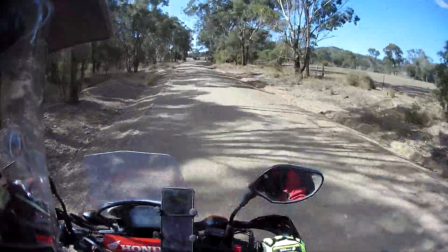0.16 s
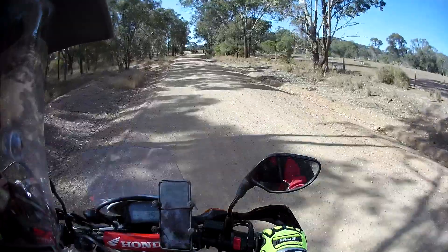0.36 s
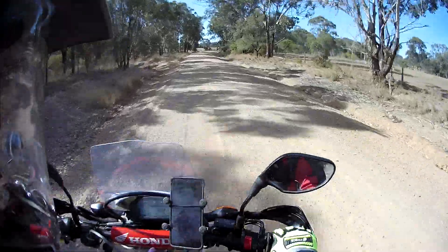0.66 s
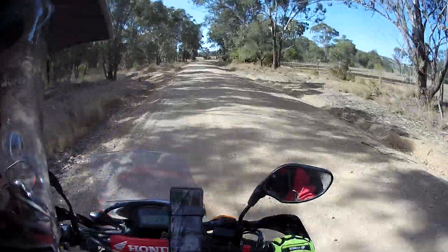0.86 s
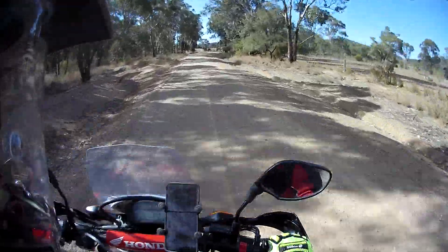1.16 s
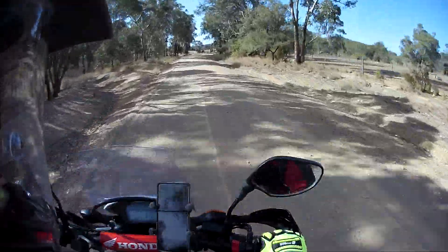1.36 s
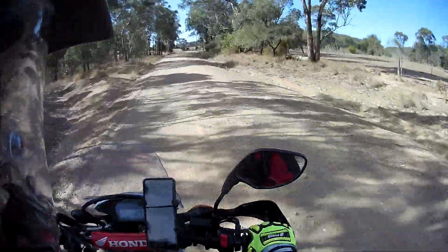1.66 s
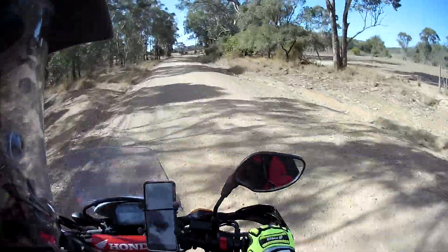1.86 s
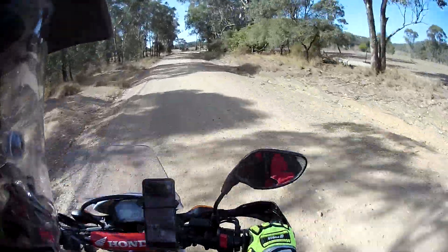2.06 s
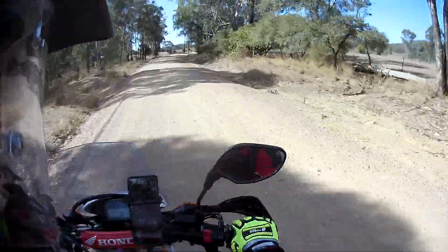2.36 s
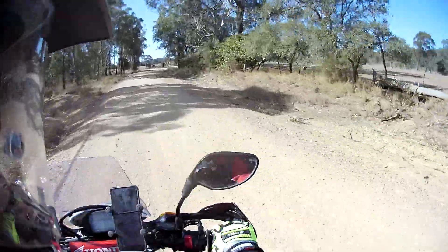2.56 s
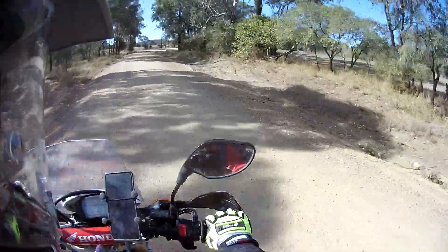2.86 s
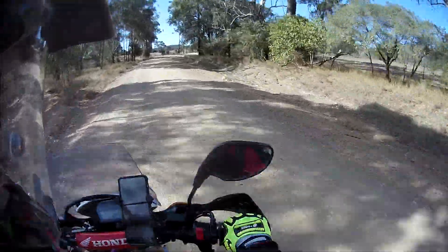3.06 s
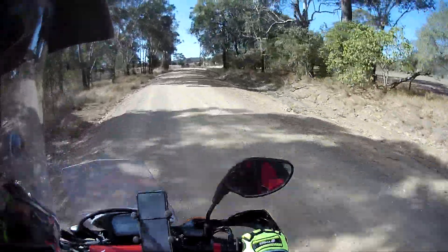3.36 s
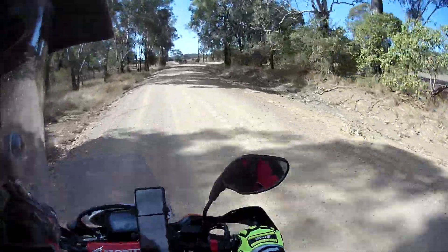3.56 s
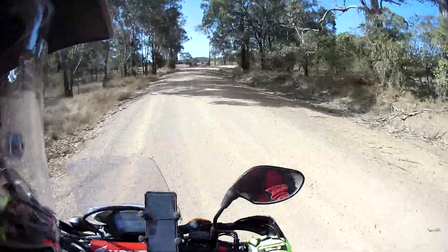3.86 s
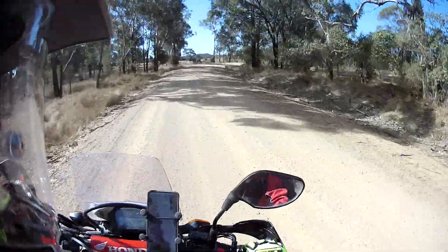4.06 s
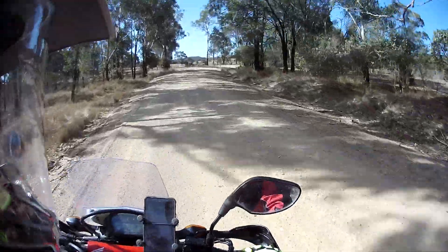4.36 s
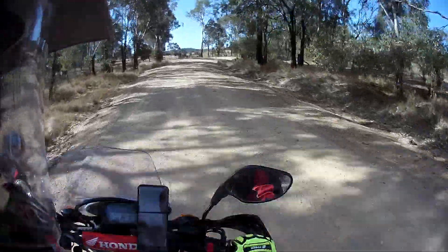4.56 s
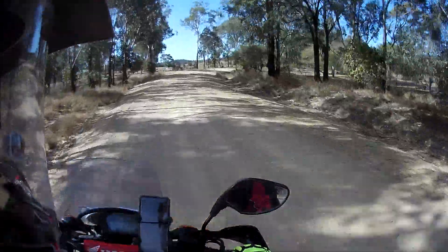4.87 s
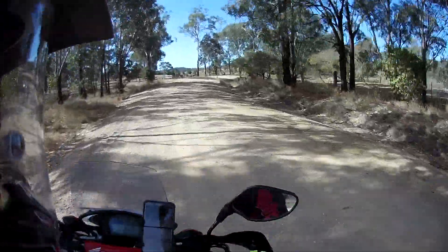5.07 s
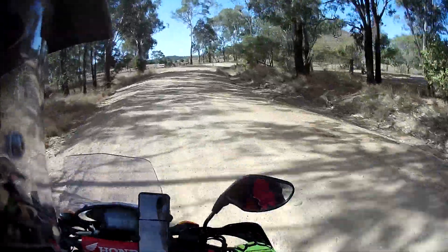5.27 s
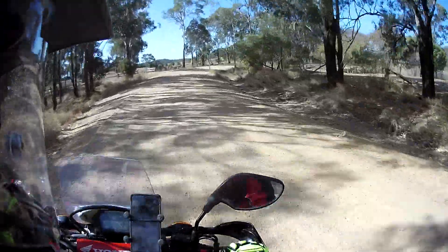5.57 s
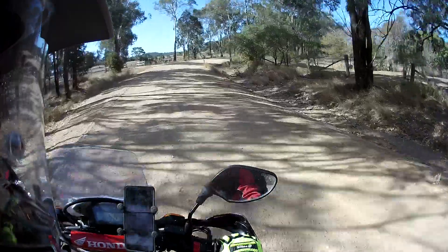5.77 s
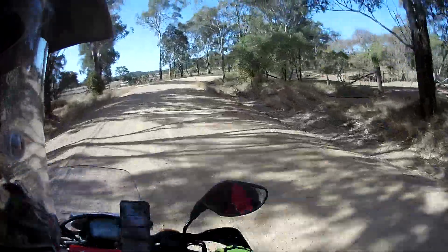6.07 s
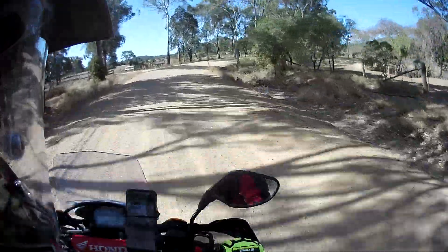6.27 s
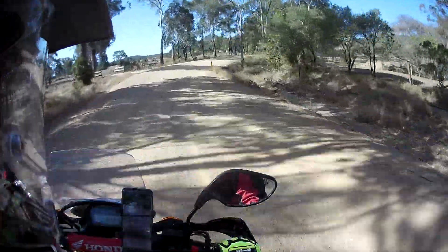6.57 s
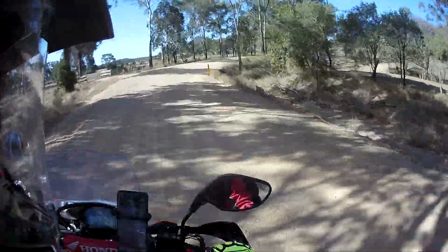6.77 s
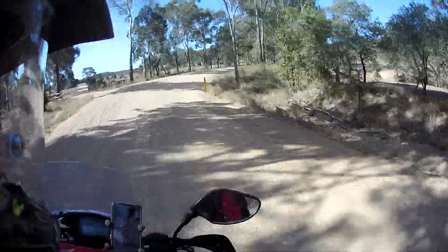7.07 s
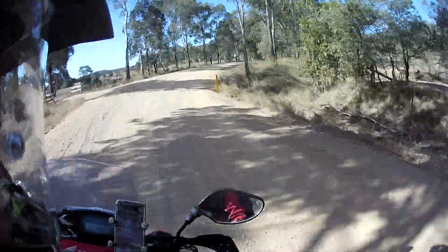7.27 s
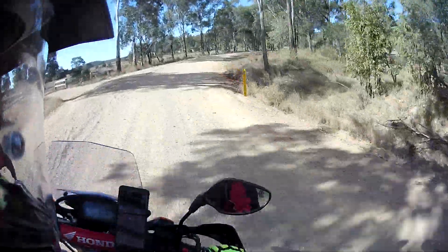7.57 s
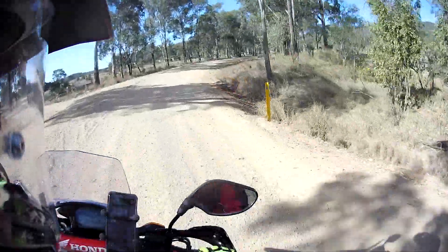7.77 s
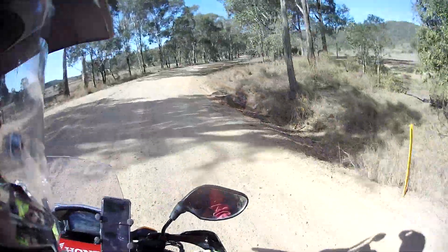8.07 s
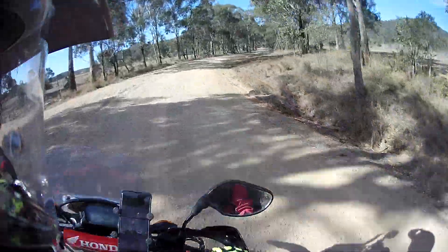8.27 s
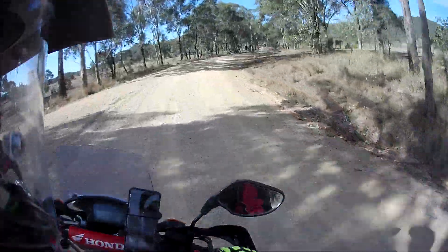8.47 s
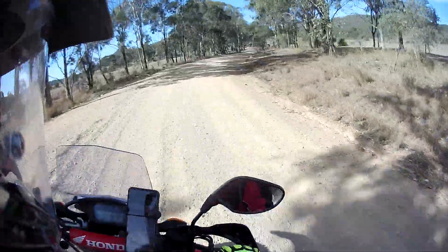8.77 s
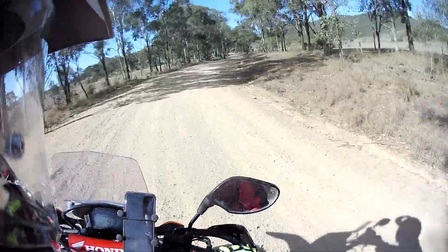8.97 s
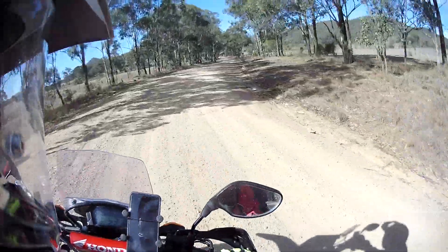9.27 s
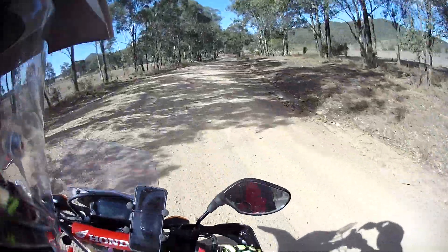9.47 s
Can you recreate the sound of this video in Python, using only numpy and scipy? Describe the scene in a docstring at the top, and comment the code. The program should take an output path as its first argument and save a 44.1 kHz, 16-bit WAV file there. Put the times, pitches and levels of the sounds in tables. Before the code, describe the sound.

A single-cylinder motorcycle slows on a gravel road amid buffeting wind and tyre rush, then its throttle opens into a steady, deepening thump.

```python
"""A single-cylinder motorcycle slows down on a gravel road, heard from the rider's helmet.
From the start it thumps, hums and whines, with wind and tyre rush made of shaped noise. In the first 1.5 s
gusts slap the helmet; ruts knock the fairing now and then until 5.4 s, both as short dying rings.
The throttle goes on and off, with a low exhaust drone of stacked sines while it is shut or barely open.
A stone pings off the bike just before 6 s. From about 7 s the throttle opens steadily, each firing
ringing the pipe in an even thump at low revs."""
import sys
import numpy as np
from scipy import signal
from scipy.fft import rfft, irfft
from scipy.io import wavfile
from scipy.ndimage import uniform_filter1d

SR = 44100
rng = np.random.default_rng(int(sys.argv[2]) if len(sys.argv) > 2 else 0)


def generate_wav(sig):
    """Save sig (samples, or channels by samples) to the path in sys.argv[1] as 16-bit PCM at SR."""
    pcm = np.round(np.clip(np.atleast_2d(sig).T, -1, 1) * 32767).astype(np.int16)
    wavfile.write(sys.argv[1], SR, pcm)


N = 425124
TIME = np.arange(N) / SR
HAND_S = 0.13  # time the hand takes to turn the grip
CRUISE_RATE = 36  # firings per second; levels that follow the revs are given at this rate


def gain_of(db):
    """Turns decibels into a gain."""
    return 10 ** (np.asarray(db) / 20)


def evened(x):
    """Scales a sound to an rms of 1."""
    return x / np.sqrt(np.mean(x ** 2) + 1e-20)


def hand_smoothed(x):
    """Spreads each sudden change over the time the hand takes to turn the grip."""
    return uniform_filter1d(x, int(HAND_S * SR))


def coloured(x, points):
    """Shapes the spectrum of x by (frequency [Hz], level [dB]) points, at an rms of 1."""
    hz, db = np.transpose(points)
    bins = np.fft.rfftfreq(N, 1 / SR)
    shape_db = np.interp(np.log(bins + 1), np.log(hz), db)
    return evened(irfft(rfft(x) * gain_of(shape_db), N))


def wander(rate_hz):
    """Smooth random drift with an rms of 1; movement much faster than the rate is faded out."""
    bins = np.fft.rfftfreq(N, 1 / SR)
    return evened(irfft(rfft(rng.standard_normal(N)) * np.exp(-(bins / rate_hz) ** 2), N))


def ring(x, hz, width_hz):
    """One resonance, fixed or moving in pitch: a click rings as a dying sine; a narrow width rings longer."""
    turn = np.exp(2j * np.pi * np.cumsum(hz * np.ones(N)) / SR)
    decay = np.exp(-np.pi * width_hz / SR)
    # the tiny offset keeps the filter from slowing down on near-zero numbers
    return (turn * signal.lfilter([1], [1, -decay], x / turn + 1e-18)).imag


def note(cycles, multiple, waver, waver_hz):
    """A sine at a whole multiple of the firing rate, its phase wavering by so many radians rms."""
    return np.sin(2 * np.pi * round(multiple) * cycles + waver * wander(waver_hz))


# Engine speed along the ride: (time [s], firing rate [firings per second])
ENGINE_SPEED = [(0, 43.8), (.6, 43.1), (1.1, 41.15), (1.5, 40.72), (1.85, 39.74), (2.15, 39.0),
                (2.35, 39.93), (2.6, 38.97), (3.3, 38.01), (3.65, 37.56), (3.85, 36.12), (4.15, 36.22),
                (4.5, 35.04), (4.8, 36.03), (5.05, 33.98), (5.3, 34.05), (5.75, 32.66), (5.95, 33.6),
                (6.2, 31.99), (6.9, 30.84), (7.15, 31.4), (7.35, 30.55), (7.6, 31.06), (7.85, 30.93),
                (8.5, 30.95), (9.64, 31.5)]


def engine_speed():
    """The firing rate, joined by straight lines; every engine sound follows it."""
    return np.interp(TIME, *np.transpose(ENGINE_SPEED))


# Twists of the throttle: (start [s], end [s], opening at the start [0-1], opening at the end [0-1])
THROTTLE_TWISTS = [(0, 1.6, .44, .17), (2.24, 3.75, .34, .28), (3.88, 4.44, .22, .17), (4.69, 5.0, .58, .4),
                   (5.84, 6.09, .68, .27), (7.09, 9.8, .56, .98)]


def grip():
    """Throttle opening: each twist is rolled on or eased off, then let go at the speed of the hand."""
    held = sum(np.interp(TIME, [start, end], [first, last], left=0, right=0)
               for start, end, first, last in THROTTLE_TWISTS)
    return np.clip(hand_smoothed(held), 0, 1)


# Silencer resonances beside the main pipe:
# (frequency [Hz], width [Hz], level with throttle shut [dB], level with throttle open [dB])
MUFFLER_MODES = [(97, 97, -7, -40), (130.5, 34, -5.5, -13), (177, 43, -10, -11.5), (276, 20, -11, -26),
                 (770, 83, -28, -19)]
# The main pipe resonance rises and rings longer as the throttle lets in hotter gas
PIPE_SHUT_HZ, PIPE_OPEN_HZ, SHUT_WIDTH_HZ, OPEN_WIDTH_HZ = 213.4, 273, 74, 37.5
HOT_OPENING = 0.7  # throttle opening at which the pipe is fully hot
# Beat level: with throttle shut, gain under full load, growth to full throttle, growth per octave of revs
SHUT_DB, LOAD_DB, OPEN_DB, BEAT_DB_PER_OCTAVE = -44.5, 6.5, 4.5, 6
PACKING_HZ = 1160  # the silencer packing soaks up the sound above this


def exhaust(cycles, octaves, throttle, load, valve_phase=0.1393):
    """Each firing sends a pulse and a puff of gas down the pipe, which rings; light firings are uneven."""
    firings = np.flatnonzero(np.diff(np.floor(cycles - valve_phase)) > 0)
    firing_load = load[firings]
    strength, delay = rng.standard_normal((len(firings), 2)).T
    uneven_db = 3 + (0.55 - 3) * firing_load  # random spread, from no load to full load
    late_s = delay * 0.000099 * (1.15 - firing_load)
    places = np.clip(firings + np.round(late_s * SR).astype(int), 0, N - 1)
    pulses = np.zeros(N)
    pulses[places] = gain_of(strength * uneven_db)
    # the hissing puff dies away within a small part of each cycle
    puff = 0.004 * np.exp(-((cycles - valve_phase) % 1) / 0.07) * rng.standard_normal(N)
    drive = pulses + puff

    heat = np.sin(np.pi / 2 * np.minimum(throttle / HOT_OPENING, 1)) ** 2
    pipe_hz = PIPE_SHUT_HZ + (PIPE_OPEN_HZ - PIPE_SHUT_HZ) * heat + 2 * wander(rate_hz=35)
    cool_pipe = ring(drive, pipe_hz, SHUT_WIDTH_HZ)
    hot_pipe = ring(drive, pipe_hz, OPEN_WIDTH_HZ)
    pipe = (1 - heat) * cool_pipe + heat * hot_pipe
    # the silencer box rings along with the pipe, so each thump swells gradually
    thump = evened(ring(pipe, pipe_hz, width_hz=140))

    # a shut throttle leaves a hollow boom; an open one brings out a higher resonance
    opening = 0.93 * throttle + 0.07 * load
    muffler = np.zeros(N)
    for hz, width_hz, shut_db, open_db in MUFFLER_MODES:
        amount = opening if open_db > shut_db else load
        muffler += gain_of(shut_db + (open_db - shut_db) * amount) * ring(drive, hz, width_hz)

    # the small outlet radiates little deep bass and softens the treble
    outlet = signal.butter(2, [100, 1000], "band", fs=SR, output="sos")
    beat_db = SHUT_DB + LOAD_DB * load + OPEN_DB * throttle + BEAT_DB_PER_OCTAVE * octaves
    beat = gain_of(beat_db) * signal.sosfilt(outlet, thump + muffler / np.std(pipe))
    packing = signal.butter(3, PACKING_HZ, fs=SR, output="sos")
    return signal.sosfiltfilt(packing, beat + bark(pulses, throttle, load))


def bark(pulses, throttle, load, bark_db=-56, open_db=16):
    """The header pipe rasps at each firing, with a short bright edge; harder as the throttle opens."""
    rasp = ring(pulses, 555, width_hz=115)
    edged = ring(rasp, 740, width_hz=380)
    return load * gain_of(bark_db + open_db * throttle) * evened(edged)


# Smooth engine notes: (multiple of the firing rate [times], level [dB])
HUM_NOTES = [(5, -42), (6, -40), (15, -47.5)]


def hum(cycles, octaves, throttle, load, db_per_octave=22, flutter_db=4.5):
    """The engine hums on part throttle, fading at low revs and when the grip is opened wide."""
    tones = sum(gain_of(db + flutter_db * wander(rate_hz=5.5)) * note(cycles, multiple, 0.25, waver_hz=4.1)
                for multiple, db in HUM_NOTES)
    return load * (1 - throttle) * gain_of(db_per_octave * np.minimum(octaves, 0)) * tones


# Resonances of the engine's metal covers: (frequency [Hz], width [Hz], relative level [dB])
CASING_MODES = [(1505, 80, 5), (1743, 250, 0.5), (1874, 110, -0.5), (1995, 100, -1.5), (2612, 150, -6.5),
                (2690, 120, -15.5), (3950, 180, -29), (4150, 89, -27.5)]


def casing(x):
    """The engine's metal covers ring when shaken, heard at an rms of 1."""
    rung = sum(gain_of(db) * width_hz * ring(x, hz, width_hz) for hz, width_hz, db in CASING_MODES)
    band = signal.butter(4, [1100, 4500], "band", fs=SR, output="sos")
    return evened(signal.sosfilt(band, rung))


# Gear whine: (multiple of the firing rate, rounded to whole [times],
# relative level with throttle shut [dB], relative level with throttle open [dB])
GEAR_TONES = [(34, -18.5, -6), (38, -15.5, 1.5), (47, -10, -1), (49, -12.5, 0), (50, -12.5, -1.5),
              (52, 1, -4), (54, -16.5, 1.5), (66.3, -7, -11), (69.8, -15, -3)]


def gears(cycles, load, whine_db=-60.0, flutter_db=3, throb=0.29):
    """Meshing teeth whine through the casing, on other tones under load than with the throttle shut."""
    tones = np.zeros(N)
    for multiple, shut_db, open_db in GEAR_TONES:
        level_db = shut_db + (open_db - shut_db) * load + flutter_db * wander(rate_hz=3.3)
        tones += gain_of(level_db) * note(cycles, multiple, 1.15, waver_hz=32)
    pressed = 1 + throb * np.sin(2 * np.pi * cycles)  # each firing presses the teeth together
    return gain_of(whine_db) * casing(tones * pressed)


def clatter(cycles, clatter_db=-59, tap_length=0.14, tap_phase=0.37):
    """Valves and chain rattle the casing as noise, hardest once in each cycle."""
    taps = 1 + np.exp(-((cycles - tap_phase) % 1) / tap_length)
    return gain_of(clatter_db) * casing(taps * rng.standard_normal(N))


# Gusts: (centre [s], length [s], lift of the buffeting [dB], lift of the rush [dB], lift of the rumble [dB])
GUST_BELLS = [(0.852, 2.6, 3, 5, 7), (0.398, 0.14, 4, 1, -2), (0.532, 0.12, 4.5, 4.5, 7),
              (0.692, 0.15, 8, 5.5, 10), (0.83, 0.3, 3.5, 3, 8), (0.98, 0.12, 2.5, 2.5, 6.5),
              (1.247, 0.29, 6.5, 5, 4), (1.347, 0.062, 5, 4, 4), (1.522, 0.074, 4.5, 1, -1),
              (2.192, 1, 0.5, 2, 3.5), (2.874, 0.26, 2.5, -1.5, -4), (3.665, 0.42, 3, 2.5, 5.5),
              (4.238, 0.22, 5, 4.5, 4.5), (5.152, 0.17, 1, 5, 9), (5.474, 0.32, 3.5, 5, 8.5),
              (5.716, 0.54, 2.5, 4, 6), (6.263, 0.19, 2.5, 3.5, 11), (6.405, 0.22, 2, 2, 3),
              (7.1, 0.33, -0.5, -0.5, 9.5), (7.976, 0.16, 5, 2, 6), (8.262, 0.39, 3.5, 2.5, 4),
              (9.146, 1.1, 4.5, 2.5, -4)]


def gusts():
    """Gusts swell and die away, each a smooth bell of level for the buffeting, the rush and the rumble."""
    bells = np.array([np.cos(np.pi * np.clip((TIME - centre) / length, -.5, .5)) ** 2
                      for centre, length, *_ in GUST_BELLS])
    return np.array(GUST_BELLS)[:, 2:].T @ bells


# Spectrum of the wind on the microphone: (frequency [Hz], relative level [dB])
BUFFET_SPECTRUM = [(30, -19.5), (70, -8.5), (110, -3), (180, -1.5), (290, -3.5), (400, -12), (600, -17.5),
                   (1000, -33), (2000, -53.5), (4000, -68.5), (8000, -87)]
# Spectrum of the deep rumble behind the windscreen: (frequency [Hz], relative level [dB])
RUMBLE_SPECTRUM = [(12, -3.5), (30, 3), (55, 5.5), (75, 3.5), (100, -5.5), (160, -28), (500, -79)]
# Levels before gusts and lee, and how they change per octave of revs
BUFFET_DB, BUFFET_DB_PER_OCTAVE = -36.5, 14
RUMBLE_DB, RUMBLE_DB_PER_OCTAVE = -45.5, -0.5
# In the bend the helmet turns into the lee of the windscreen
LEE_START_S, LEE_TURN_S, LEE_BUFFET_DB, LEE_RUMBLE_DB = 7.15, 0.44, -3, -4.5


def wind(eddies, octaves, gust_db, deep_gust_db, lump_db=1.54, deep_swell_db=1.0):
    """Low buffeting that comes in lumps as eddies pass the helmet, over a deep rumble."""
    lee = np.clip((TIME - LEE_START_S) / LEE_TURN_S, 0, 1)
    buffet_db = BUFFET_DB + BUFFET_DB_PER_OCTAVE * octaves + gust_db + LEE_BUFFET_DB * lee
    rumble_db = RUMBLE_DB + RUMBLE_DB_PER_OCTAVE * octaves + deep_gust_db + LEE_RUMBLE_DB * lee
    rumble_db += deep_swell_db * wander(rate_hz=3.8)
    lumpy_noise = rng.standard_normal(N) * gain_of(lump_db * eddies)
    buffet = gain_of(buffet_db) * coloured(lumpy_noise, BUFFET_SPECTRUM)
    rumble = gain_of(rumble_db) * coloured(rng.standard_normal(N), RUMBLE_SPECTRUM)
    return buffet + rumble


# Spectrum of the rush of tyres and air: (frequency [Hz], relative level [dB])
RUSH_SPECTRUM = [(100, -18.5), (300, 4.5), (450, 6.5), (700, 7.5), (950, 1.5), (1300, -1), (1700, -6),
                 (2100, -10), (2450, -15), (2900, -19.5), (3600, -28), (4300, -40), (5000, -39.5),
                 (7000, -46), (9000, -57.5), (12500, -64.5)]
RUSH_DB, RUSH_DB_PER_OCTAVE = -48.5, 14  # level before gusts, and growth per octave of revs


def tyres(eddies, octaves, gust_db, lump_db=1.6, crunch_per_s=160, crunch=0.37, spread_db=2.0):
    """Tyres and air rush as noise, with clicks of gravel under the tread; eddies shake the lower part."""
    struck = rng.random(N) < crunch_per_s / SR
    size = gain_of(spread_db * np.minimum(rng.exponential(1, N), 4))
    gravel = struck * size * rng.choice([-1, 1], N)
    rush = rng.standard_normal(N) + crunch * evened(gravel)
    lower_part = signal.butter(2, 1700, fs=SR, output="sos")
    lumps = signal.sosfiltfilt(lower_part, rush * (gain_of(lump_db * eddies) - 1))
    rush_db = RUSH_DB + RUSH_DB_PER_OCTAVE * octaves + gust_db
    return gain_of(rush_db) * coloured(rush + lumps, RUSH_SPECTRUM)


def blows(events, modes):
    """Each blow rings the struck part for up to 0.1 s, its modes in random sign."""
    out, age = np.zeros(N), np.arange(SR // 10) / SR
    contact = np.minimum(age * modes[0][0], 1) ** 2  # builds up over one cycle of the first mode listed
    for start_s, peak_db in events:
        rung = np.zeros(len(age))
        for hz, db, t60 in modes:
            rung += rng.choice([-1, 1]) * gain_of(db - 60 * age / t60) * np.sin(2 * np.pi * hz * age)
        rung *= contact
        out[round(start_s * SR):][:len(age)] += gain_of(peak_db) * rung / abs(rung).max()
    return out


# Large eddies slap the helmet: (time [s], peak level [dB])
SLAP_TIMES = [(0.345, -28), (0.69, -16), (0.822, -23), (0.88, -29), (1.208, -13.5), (1.515, -26)]
# Low boom of the helmet shell: (frequency [Hz], relative level [dB], time to fall 60 dB [s])
HELMET_MODES = [(59.4, -7.5, 0.12), (81.7, 0, 0.1), (121.6, 1, 0.075)]


def helmet_slaps():
    """Large eddies slap the helmet, and its shell booms low."""
    return blows(SLAP_TIMES, HELMET_MODES)


# The suspension knocks over ruts: (time [s], peak level [dB])
KNOCK_TIMES = [(.484, -30), (.795, -21), (.832, -24), (1.34, -25), (4.235, -32), (5.139, -31), (5.42, -37)]
# Ring of the fairing: (frequency [Hz], relative level [dB], time to fall 60 dB [s])
FAIRING_MODES = [(400, 2, 0.029), (502, 3, 0.015), (690, 7, 0.0036), (867, -4.5, 0.049),
                 (1410, -13.5, 0.038), (1850, -22, 0.012)]


def suspension_knocks():
    """The suspension knocks over ruts, and the fairing rings briefly."""
    return blows(KNOCK_TIMES, FAIRING_MODES)


# Exhaust drone: (multiple of the firing rate [times], level [dB])
DRONE_NOTES = [(3, -40.5), (4, -43), (6, -47), (7, -52), (9, -52)]
# Times when the exhaust drones low, with the throttle shut or barely open:
# (start [s], end [s], change of the drone level [dB])
DRONE_TIMES = [(1.5, 2.22, 2), (3.72, 4.45, 0), (5.2, 5.82, 1), (6.2, 6.9, -1.5)]


def exhaust_drone(cycles, octaves, flutter_db=2.9, db_per_octave=8):
    """The exhaust drones low with the throttle shut or barely open, swelling at the speed of the hand."""
    tones = sum(gain_of(db + flutter_db * wander(rate_hz=5.4)) * note(cycles, multiple, 0.5, waver_hz=6.2)
                for multiple, db in DRONE_NOTES)
    droning = sum(gain_of(db) * ((TIME > start) & (TIME < end)) for start, end, db in DRONE_TIMES)
    return hand_smoothed(droning) * gain_of(db_per_octave * octaves) * tones


# A stone strikes the bike: (time [s], peak level [dB])
STONE_TIMES = [(5.8545, -34)]
# Ring of the stone's blow: (frequency [Hz], relative level [dB], time to fall 60 dB [s])
STONE_MODES = [(1870, 2.5, 0.015), (2380, -20, .008), (3330, -9, 0.0082), (4060, -17, 0.015),
               (5700, -15, .004), (8300, -10, 0.002), (10700, -19, 0.0033)]


def stone_ping():
    """A stone strikes the bike with a short, bright ring."""
    return blows(STONE_TIMES, STONE_MODES)


HALF_LOAD = 0.22  # throttle opening at which the engine takes up half its load


def scene():
    """Adds up engine, wind and road at the helmet."""
    speed, throttle = engine_speed(), grip()
    cycles = np.cumsum(speed) / SR  # one cycle is one firing
    octaves = np.log2(speed / CRUISE_RATE)
    load = 1 - .5 ** ((throttle / HALF_LOAD) ** 2)
    wind_db, rush_db, rumble_db = gusts()
    eddies = wander(rate_hz=47)  # the same eddies shake the wind and the rush
    engine = exhaust(cycles, octaves, throttle, load) + hum(cycles, octaves, throttle, load)
    engine += exhaust_drone(cycles, octaves)
    machinery = (gears(cycles, load) + clatter(cycles)) * (speed / speed.mean()) ** 2.5  # louder at high revs
    air = wind(eddies, octaves, wind_db, rumble_db) + tyres(eddies, octaves, rush_db)
    hits = helmet_slaps() + suspension_knocks() + stone_ping()
    return (engine + machinery + air + hits)[None]


# Spectrum of the microphone hiss: (frequency [Hz], relative level [dB])
HISS_SPECTRUM = [(100, -0.5), (4000, 0), (7000, 3.5), (12500, 0.5)]
EDGE_HZ = 12750  # upper edge of the sound


def record(dry):
    """Adds faint microphone hiss, softens both ends over 3 ms and removes the treble above the edge."""
    hissing = dry + gain_of(-87) * coloured(rng.standard_normal(N), HISS_SPECTRUM)
    ends = np.minimum(np.minimum(TIME, TIME[-1] - TIME) / .003, 1)
    band_limit = signal.firwin(511, EDGE_HZ, window=("kaiser", 9), fs=SR)
    return signal.oaconvolve(hissing * ends, band_limit[None], "same")


dry = scene()
out = record(dry)
generate_wav(out)
```